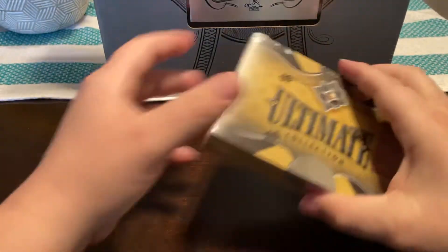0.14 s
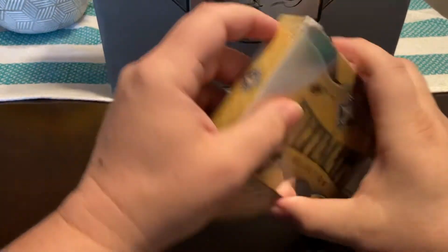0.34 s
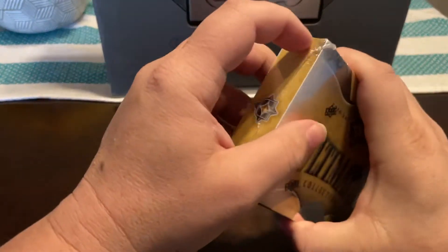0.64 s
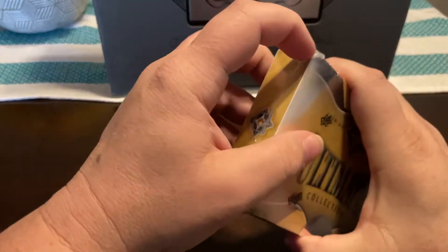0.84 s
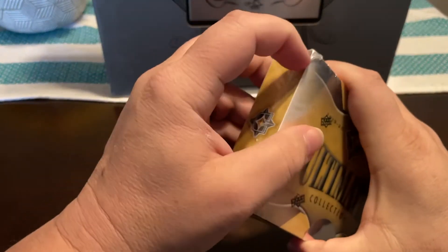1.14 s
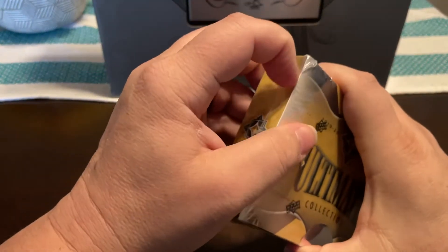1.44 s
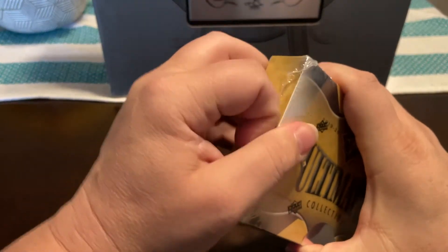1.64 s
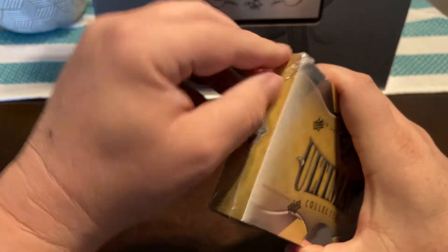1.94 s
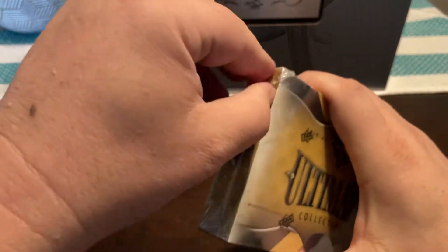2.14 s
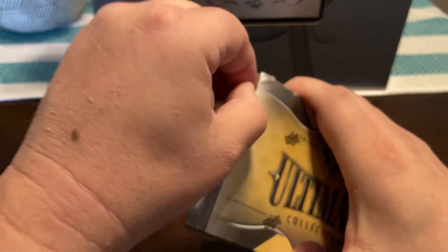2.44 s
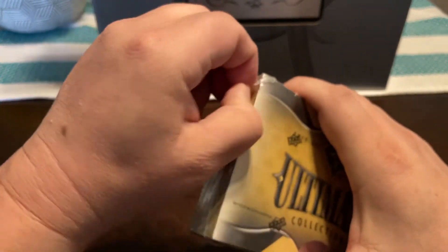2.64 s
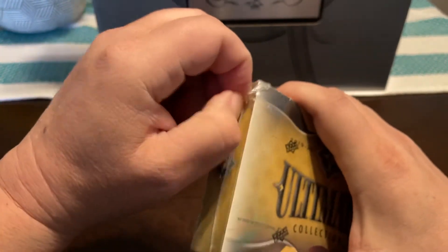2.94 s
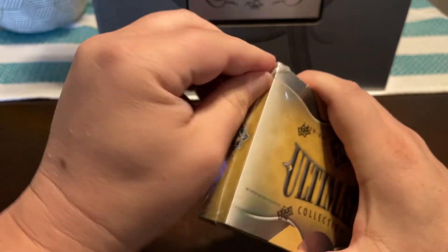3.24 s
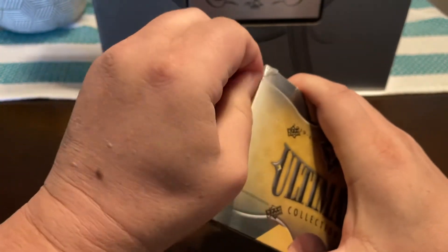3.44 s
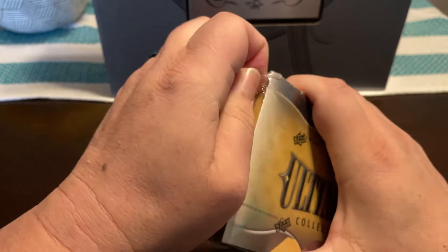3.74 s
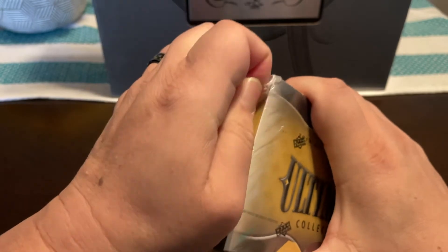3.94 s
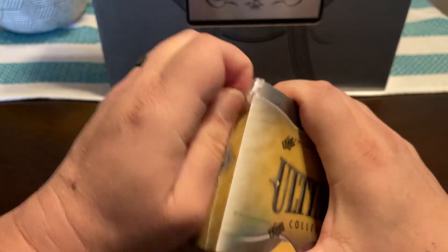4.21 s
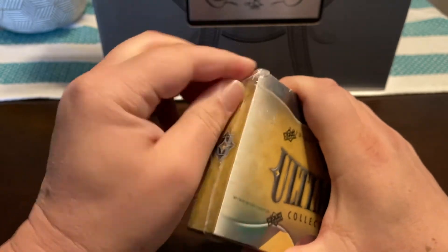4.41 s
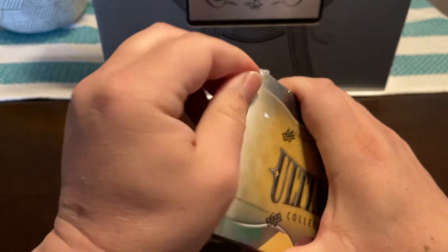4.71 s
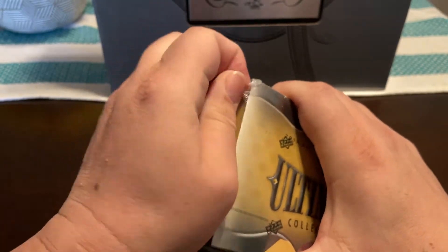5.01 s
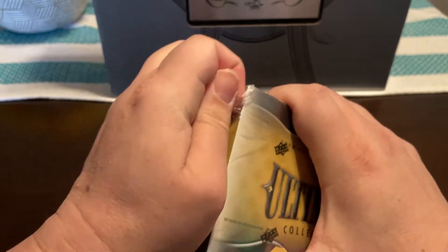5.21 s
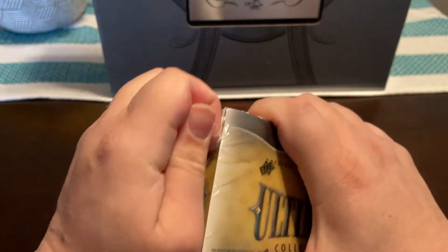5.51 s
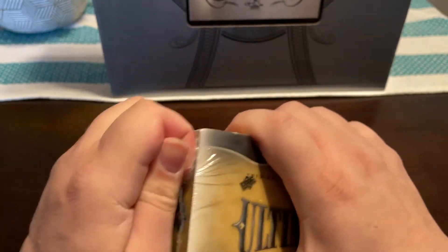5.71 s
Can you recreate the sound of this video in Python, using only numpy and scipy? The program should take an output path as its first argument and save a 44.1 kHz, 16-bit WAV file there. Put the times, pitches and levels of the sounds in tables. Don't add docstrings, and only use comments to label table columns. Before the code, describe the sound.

Close, dry stereo phone pickup in a quiet room with a very faint low hum of distant machines. From 0 to 0.3 s a small cardboard box is taken up: soft hollow thumps, a low table bump and skin rub. It stays nearly quiet until about 0.85 s, when a dull knock and low thud come. Bright film ticks gather from 1.15 s, and at 1.45 s one loud, short snap, woody and cracking, stands far above everything else. Crinkles and rubbing fade after it; knocks and brushing return around 1.8-2.0 s. From 2.1 to 2.8 s there is delicate picking with a thin smooth hiss, then a small knock near 2.9 s and sparse ticks. Crackles thicken after 3.6 s, with a stronger scrunch and box knocks around 4.1-4.35 s. Irregular crisp ticks, pops and light taps continue, with a last crackle and rub near 5.75 s.

```python
import sys
import numpy as np
from scipy import signal
from scipy.fft import rfft, irfft
from scipy.io import wavfile
from scipy.ndimage import uniform_filter1d, minimum_filter1d

SR = 44100
rng = np.random.default_rng(int(sys.argv[2]) if len(sys.argv) > 2 else 0)


def level_to_linear(level):
    exponent = np.asarray(level, float) / 20
    return 10 ** exponent


def transcribe(signal):
    frames = np.atleast_2d(signal).T
    limited = np.clip(frames, -1, 1)
    pcm = np.round(limited * 32767).astype(np.int16)
    wavfile.write(sys.argv[1], SR, pcm)


N = 258426

# start_s [s], peak_db [dB], pitch_hz [Hz], t60_s [s]
THUMPS = [(0.08, -29.5, 411, 0.03), (0.197, -38, 439, 0.048), (0.839, -29.5, 323, 0.089),
          (0.912, -35, 229, 0.054), (1.293, -40, 355, 0.063), (1.329, -31.5, 241, 0.097),
          (1.455, -24, 331, 0.034), (1.574, -46.5, 372.6, 0.06), (1.836, -36.5, 354, 0.12),
          (1.986, -28.5, 326, 0.061), (2.91, -46, 428, .07), (3.221, -47, 225, .07),
          (3.481, -35, 253, 0.056), (3.779, -47.5, 208, .07), (4.214, -30.5, 404, 0.065),
          (4.342, -36, 400, 0.055), (4.522, -33.5, 370, 0.048), (5.244, -38, 270.6, 0.062),
          (5.654, -39, 260, 0.074), (0.104, -35.5, 337, 0.052), (1.868, -36.5, 328, 0.062),
          (4.196, -40, 353, 0.035), (0.249, -54, 430, 0.055), (0.282, -46.5, 402, .05),
          (5.13, -41.5, 344, .05)]


def evened(x):
    return x / np.sqrt(np.mean(x ** 2) + 1e-20)


def peaked(x):
    return x / np.abs(x).max()


def read(points, hz):
    point_hz, value = np.transpose(points)
    return np.interp(np.log(hz + 1), np.log(point_hz + 1), value)


def colour(x, points, turn=1):
    n = x.shape[-1]
    gain = level_to_linear(read(points, np.fft.rfftfreq(n, 1 / SR)))
    return irfft(rfft(x) * turn * gain, n)


def band(x, lo_hz, hi_hz):
    sos = signal.butter(2, [lo_hz, hi_hz], "bandpass", fs=SR, output="sos")
    return signal.sosfilt(sos, x)


def dying(t, t60_s, rise_s):
    return (1 - np.exp(-t / rise_s)) ** 2 * level_to_linear(-60 * t / t60_s)


def add(mix, start_s, sound):
    part = mix[..., round(start_s * SR):][..., :sound.shape[-1]]
    part += sound[..., :part.shape[-1]]


def ticks():
    # start_s [s], peak_db [dB], pitch_hz [Hz], dull_db [dB]
    loud = [(.8377, -31, 10800, -2.5), (1.149, -33, 9600, -16), (1.1652, -26, 10700, -16.5),
            (1.1844, -36, 9900, -19), (1.2037, -31, 11100, -19), (1.2939, -41.5, 12200, -11),
            (1.3156, -25.5, 11000, -8), (1.3366, -23, 9400, -4), (1.4318, -37, 10200, -8),
            (1.4515, -11, 10600, -14), (1.8107, -35, 11400, -32), (1.9025, -44, 10500, 3),
            (1.9625, -25.5, 9900, -20), (1.9776, -31, 10770, -15), (1.9882, -20.5, 10800, -2.5),
            (2.0347, -28, 10400, -36), (2.5872, -33.5, 9900, -25.5), (4.1015, -35, 11090, -14),
            (4.1208, -31.5, 9600, -19), (4.4922, -27, 11900, -23), (4.698, -32, 12500, -12.5),
            (4.7041, -35.5, 10100, -24.5), (4.7905, -33, 9600, -12.5), (4.795, -33.5, 10300, -25),
            (4.9882, -28.5, 9800, -15), (5.3416, -29.5, 11100, -15), (5.4112, -24, 11250, -13),
            (5.4407, -31, 13600, -4.5), (5.7566, -35, 11000, -16), (5.7768, -33.5, 12600, 2)]
    # start_s [s], peak_db [dB]
    seam_buckles = [(.8941, -52), (.9794, -66), (1.051, -55), (1.038, -54), (1.083, -55.5), (1.135, -46),
                    (1.3023, -45.5), (1.323, -36), (1.44, -42), (1.445, -39.5), (1.6332, -52), (1.819, -39.5),
                    (1.83, -37), (1.907, -41.5), (2.2442, -46), (2.2618, -38.5), (2.322, -35.5), (2.3388, -43),
                    (2.5286, -46), (2.5514, -58), (2.636, -43.5), (2.877, -42.5), (2.9764, -48.5), (3.0877, -40.5),
                    (3.1362, -50.5), (3.191, -44.5), (3.2767, -58), (3.303, -55), (3.3327, -56), (3.3893, -44),
                    (3.5626, -53), (3.5846, -42.5), (3.607, -52), (3.6948, -41), (3.7057, -47), (3.732, -38.5),
             (3.748, -43), (3.774, -40), (3.802, -40), (3.8105, -35), (3.84, -50), (3.8901, -42),
             (3.8965, -39.5), (4.0669, -50), (4.0865, -35), (4.5816, -48), (4.5974, -43), (4.6798, -44.5),
             (4.7329, -36), (4.7654, -45), (4.8496, -37), (4.867, -45), (5.052, -49), (5.1748, -36.5),
             (5.2343, -55), (5.519, -48), (5.533, -41), (5.718, -37), (5.765, -34.5)]
    # start_s [s], peak_db [dB]
    flaps = [(1.8806, -37.5), (2.0726, -40.5), (2.182, -34), (2.367, -50), (2.4087, -49), (2.619, -45.5),
             (2.851, -46), (3.047, -39.5), (3.08, -48), (3.1023, -45), (3.2201, -43), (3.6143, -51),
             (3.6708, -44.5), (3.8156, -39.5), (3.9518, -34), (4.1278, -44), (4.14, -36.5), (4.192, -45),
             (4.206, -42), (4.461, -46), (4.5343, -40), (4.5603, -45), (5.079, -39), (5.108, -41.5),
             (5.149, -46), (5.2003, -42), (5.2463, -49), (5.256, -51), (5.4873, -33.5), (5.708, -34.5)]
    # freq_hz [Hz], level_db [dB]
    mic = [(7000, -1.5), (8500, -4.5), (11000, 2), (14000, -6), (16800, -3)]
    seam_hz, seam_dull_db, flap_hz, flap_dull_db = 11500, -18, 6240, -10
    pitch_spread, dull_spread_db = 0.11, 4

    rows = list(loud)
    small = [(*b, seam_hz, seam_dull_db) for b in seam_buckles]
    small += [(*b, flap_hz, flap_dull_db) for b in flaps]
    for start_s, db, hz, dull_db in small:
        u, v = rng.standard_normal(2).clip(-2, 2)
        rows.append((start_s, db, hz * (1 + pitch_spread * u), dull_db + dull_spread_db * v))

    out, t = np.zeros((2, N)), np.arange(900) / SR
    for start_s, db, hz, dull_db in rows:
        a, b = rng.standard_normal((2, 900))
        bright = peaked(band(a * dying(t, 0.01, 0.00045), hz * 0.88, hz * 1.134))
        wide = peaked(band(b * dying(t, 0.0061, 0.00056), 5000, 15500))
        dull = peaked(band(b * dying(t, 0.012, 0.00026), 1800, 6300))
        sound = 0.56 * bright + 0.81 * wide + level_to_linear(dull_db) * dull
        side_db = .4 + 1.5 * a[0]
        add(out, start_s, level_to_linear(db + np.array([[side_db], [-side_db]])) * sound)
    return colour(out, mic)


def snap():
    # start_s [s], box_db [dB], crack_db [dB]
    tear = (1.4525, -3.5, -19)
    # mode_hz [Hz], level_db [dB], t60_s [s]
    modes = [(780, -15, .014), (940, -6, .013), (1360, 1, .012), (1520, -9, .014), (1780, -5, .013),
             (2200, -17, .012), (2520, -17, .012), (3900, -17, .012)]
    start_s, box_db, crack_db = tear
    out, t = np.zeros(N), np.arange(6000) / SR
    swing = t - .0025
    box = np.zeros(len(t))
    for hz, db, t60_s in modes:
        box += level_to_linear(db) * np.sin(2 * np.pi * hz * swing) * dying(t, t60_s, .004)
    crack = band(rng.standard_normal(len(t)), 2400, 9300) * dying(t, 0.04, 0.0017)
    strain = np.linspace(0, 1, 400) ** 2
    creak = band(rng.standard_normal(400), 1150, 1900) * strain
    add(out, start_s, level_to_linear(box_db) * peaked(box))
    add(out, start_s - .0006, level_to_linear(crack_db) * peaked(crack))
    add(out, start_s - 350 / SR, level_to_linear(-17.5) * peaked(creak))
    return out


def rings(rows, spread, rough, rise_cycles):
    out, t = np.zeros(N), np.arange(8000) / SR
    for start_s, db, hz, t60_s in rows:
        u, v = rng.random(2)
        second_hz = hz * (1 + spread * (.5 + u))
        pair = np.sin(2 * np.pi * hz * t) + 0.3 * np.sin(2 * np.pi * (second_hz * t + v))
        grit = evened(band(rng.standard_normal(8000), hz * 0.3, hz * 1.86))
        blow = (pair + rough * grit) * dying(t, t60_s, rise_cycles / hz)
        add(out, start_s, level_to_linear(db) * peaked(blow))
    return out


def knocks_and_pings():
    # start_s [s], peak_db [dB], pitch_hz [Hz], t60_s [s]
    knocks = [(0.08, -40, 1070, 0.017), (0.196, -38, 1284, 0.042), (0.407, -41, 1002, 0.026),
              (0.839, -32, 1307, 0.036), (1.294, -35, 1335, 0.023), (1.315, -36.5, 1460, 0.035),
              (1.33, -34, 1330, 0.015), (1.698, -46, 1280, 0.035), (1.833, -26.5, 1390, 0.014),
              (1.858, -30.5, 993, 0.025), (1.989, -30.5, 1043, 0.031), (2.904, -35, 965, 0.032),
              (2.954, -43, 1230, 0.019), (3.221, -47, 992, 0.015), (3.48, -44, 1006, 0.02),
              (3.695, -42.5, 1260, 0.0066), (3.766, -39.5, 1030, 0.028), (3.88, -39.5, 1100, 0.0051),
              (4.095, -37.5, 997, 0.046), (4.169, -31.5, 964, 0.019), (4.194, -39, 980, 0.061),
              (4.335, -43, 996, 0.034), (4.597, -47, 1020, 0.011), (4.843, -45.5, 1090, 0.011),
              (5.046, -43.5, 1060, 0.029), (5.128, -39.5, 1186, 0.022), (5.248, -39, 1280, 0.02),
              (5.41, -32.5, 1300, 0.0088), (5.443, -39.5, 1030, 0.025), (5.777, -34.5, 990, 0.02)]
    # start_s [s], peak_db [dB], pitch_hz [Hz], t60_s [s]
    pings = [
        (1.5, -44, 2300, 0.022),
        (4.856, -45.5, 2640, 0.048),
        (4.8, -47, 1300, 0.017),
        (5.1, -52, 1050, 0.038),
        (2.82, -52.5, 520, 0.041),
    ]
    return rings(knocks + pings, .3, 0.49, 0.95)


def thumps():
    return rings(THUMPS, 0.28, 0.32, 0.51)


def bumps():
    # start_s [s], peak_db [dB], pitch_hz [Hz]
    pushes = [(0.108, -34, 72.6), (0.199, -45, 109), (0.674, -39.5, 118), (0.84, -41, 99),
              (0.911, -26.5, 113), (1.452, -26.5, 112.4), (1.708, -32.5, 109.4), (1.996, -38, 106),
              (2.921, -46.5, 102.8), (4.2, -38, 122.7), (5.125, -43.5, 121.6), (5.246, -43, 96)]
    t60_s = .115
    return rings([(*b, t60_s) for b in pushes], 0.92, 0.085, 0.076)


def pops():
    # start_s [s], peak_db [dB], pitch_hz [Hz]
    creases = [(0.104, -42, 2000), (.121, -47, 2400), (1.439, -41.5, 1800), (1.586, -49, 950),
               (1.625, -41.5, 750), (1.815, -50, 1360), (1.823, -50, 1400), (1.842, -46, 1500),
               (1.849, -42, 1060), (1.853, -42, 3900), (4.578, -47, 1150), (4.607, -50, 1240),
               (2.915, -46.5, 1490), (2.93, -51, 1970), (2.942, -45, 1180), (1.859, -32, 1740),
               (1.902, -47, 1320), (3.6711, -47, 3340), (3.6717, -50.5, 1400), (3.7319, -48, 1300),
               (3.7986, -46, 2180), (3.8282, -46, 4500), (3.829, -46, 1910), (3.9514, -47, 1270),
               (4.0223, -58, 3200), (4.0502, -59, 1280), (4.0871, -48, 2400), (4.134, -50, 1050),
               (4.147, -50, 1100), (4.1684, -42, 2630), (4.204, -41, 1770), (4.307, -45.5, 1760),
               (4.3204, -43, 1890), (4.327, -44.5, 2270), (4.338, -43, 2660), (4.492, -57, 3420),
               (4.6977, -51, 3570), (4.7227, -54, 1890), (4.7641, -59, 1780), (4.8438, -48, 2200),
               (4.9511, -46, 1150), (4.954, -48, 3200), (4.9957, -39, 3640), (5.016, -46, 1050),
               (5.0802, -49, 1260), (5.1078, -44, 3310), (5.1882, -46, 2170), (5.257, -41.5, 2570),
               (5.262, -34.5, 2000), (5.282, -51, 2970), (5.4844, -55, 1500), (5.5328, -63, 2680),
               (5.595, -49, 2900), (5.6533, -50.5, 2140), (5.687, -49.5, 1900), (5.7075, -43, 4290),
               (5.7508, -50, 1250), (5.8292, -54, 1370),
               (2.0772, -50, 1080), (2.1815, -50, 1350), (2.3292, -50.5, 1260), (2.488, -58, 1470),
             (2.5872, -59, 939), (2.6599, -54, 942), (2.7936, -66, 1300), (2.821, -61, 1245),
             (2.8485, -57, 999), (2.8851, -40, 3530), (2.904, -37, 1030), (2.9538, -44.5, 1230),
             (3.0171, -55, 1240), (3.047, -49.5, 3280), (3.08, -55.5, 3410), (3.1024, -63, 1150),
             (3.1368, -63, 947), (3.1583, -63, 991), (3.1907, -58, 960), (3.2204, -45, 1070),
             (3.3893, -58.5, 3190), (3.4421, -55.5, 1770), (3.4805, -45.5, 987)]
    t60_s = 0.01
    return rings([(*p, t60_s) for p in creases], 0.18, 0.5, 1.5)


def grains(per_s, spread_db, t60_s):
    size = level_to_linear(spread_db * np.minimum(rng.exponential(1, N), 5))
    slips = size * (rng.random(N) < per_s / SR)
    puff = dying(np.arange(2000) / SR, t60_s, 0.000086)
    return signal.oaconvolve(slips, puff)[:N] * rng.standard_normal(N)


def strokes():
    # strongest_s [s], rise_s [s], fall_s [s], film_db [dB], card_db [dB]
    moves = [(0, .05, 0.19, -70, -68.5), (.1, 0.047, 0.47, -61.5, -62), (.45, 0.71, 0.19, -69, -66),
             (.66, 0.082, 0.21, -81, -66), (.86, 0.058, 0.1, -85, -62.5), (1.16, .03, 0.19, -69.5, -69),
             (1.33, 0.044, 0.056, -56, -58), (1.469, .033, 0.072, -49.5, -63),
             (1.55, 0.038, 0.25, -62.5, -55.5), (1.85, 0.086, 0.12, -68, -55.5),
             (2.002, .05, 0.22, -68, -57.5), (2.26, 0.28, 0.23, -67, -59.5), (2.62, 0.073, 0.085, -71, -76),
             (2.928, 0.078, 0.1, -60.5, -60.5), (3.091, 0.074, 0.16, -76.5, -78),
             (3.221, 0.099, 0.094, -70, -66), (3.48, 0.086, 0.12, -63.5, -63),
             (3.81, 0.25, 1, -67.5, -63.5), (4.19, 0.24, 0.11, -63, -56.5),
             (4.337, 0.06, 0.035, -63.5, -57), (4.53, 0.061, 0.079, -61.5, -57),
             (4.86, 0.37, 1, -70.5, -64), (5.27, 0.13, 1, -65.5, -62.5), (5.77, 0.12, 0.1, -56, -54.5)]
    card_follows, hollow_follows = 0.67, 0.78
    film_share = 0.95
    rattle_db, rattle_t60_s = -17, 0.25

    t = np.arange(0, N + 64, 64) / SR
    peak_s, rise_s, fall_s, film_db, card_db = np.transpose(moves)[:, :, None]
    away_db = -20 * np.where(t < peak_s, (peak_s - t) / rise_s, (t - peak_s) / fall_s)
    film = film_db + away_db
    card = card_db + card_follows * away_db
    dull = film_share * film + (1 - film_share) * card - 2.5
    hollow = card_db - 1 + hollow_follows * away_db
    levels = []
    for db in (film, dull, card, hollow):
        levels.append(np.interp(np.arange(N) / SR, t, level_to_linear(db.max(0))))
    rattle = dying(np.arange(SR // 2) / SR, rattle_t60_s, .004)
    for start_s, db, *_ in THUMPS:
        add(levels[-1], start_s, level_to_linear(db + rattle_db) * rattle)
    return levels


def rub():
    # start_s [s], length_s [s], film_db [dB], card_db [dB]
    scrunches = [(0.069, 0.053, -72, -55), (0.17, 0.043, -64, -55.5), (1.3154, 0.038, -58, -53.5),
                 (1.568, 0.073, -58.5, -57.5), (1.82, 0.067, -72, -53), (2.9, 0.058, -67, -57),
                 (1.695, 0.042, -85, -64), (4.07, 0.064, -53, -75), (4.167, 0.051, -49.5, -47),
                 (4.301, 0.046, -63, -61), (0.22, 0.1, -70.5, -68), (0.42, 0.13, -72.5, -77.5),
                 (0.58, 0.09, -70, -91), (3.373, .175, -68.5, -79), (2.6, .04, -97, -70),
                 (2.44, .3, -89, -69.5), (1.0, 0.092, -93, -69.5), (1.46, .07, -56.5, -52),
                 (4.46, 0.05, -85, -65), (5.247, 0.034, -84, -50.5), (5.7, 0.059, -54, -69)]
    # start_s [s], end_s [s], catch [0-1] of the nails
    gliding = [
        (0, .8, 0),
        (2.1, 2.58, 1),
        (3.39, 3.56, 0),
    ]
    # freq_hz [Hz], level_db [dB per Hz]
    film_tone = [(4000, -16.5), (5500, -3), (7300, -4), (8400, -16), (9600, -1.5), (12100, -4),
                 (13600, -11), (14600, -10), (16500, -27.5)]
    # freq_hz [Hz], level_db [dB per Hz]
    card_tone = [(500, -6.5), (650, -6), (1030, 0.5), (1500, -4.5), (2300, -8.5), (3000, -23)]

    film, dull, card, hollow = strokes()
    for start_s, length_s, film_db, card_db in scrunches:
        burst = signal.windows.tukey(round(length_s * SR), .4)
        add(film, start_s, level_to_linear(film_db) * burst)
        add(dull, start_s, level_to_linear(film_db - 13.5) * burst)
        add(card, start_s, level_to_linear(card_db) * burst)

    catching, smooth = np.ones(N), np.zeros(N)
    for start_s, end_s, catch in gliding:
        span = slice(round(start_s * SR), round(end_s * SR))
        catching[span] = catch
        smooth[span] = .7
    even = smooth * rng.standard_normal((2, N))
    rough = np.sqrt(1 - smooth ** 2)

    catches = catching * evened(grains(200, 3, 0.007))
    slips = evened(grains(3000, 2, 0.013)) + 1.5 * catches
    dull_slips = .4 * catches + even[0] + rough * evened(grains(500, 2.0, 0.022))
    card_slips = even[1] + rough * evened(grains(700, 2.4, 0.021))
    hollow_slips = band(band(grains(130, 1.3, 0.018), 240, 480), 240, 480)
    out = film * evened(colour(slips, film_tone))
    out += dull * evened(band(dull_slips, 2500, 4600))
    out += card * evened(colour(card_slips, card_tone))
    return out + hollow * evened(hollow_slips)


def sweeps():
    # start_s [s], length_s [s], level_db [dB], centre_hz [Hz]
    passes = [
        (0.085, 0.46, -81, 3700),
        (2.18, 0.45, -74, 4460),
        (3.389, 0.13, -77, 3450),
        (1.696, 0.048, -56, 1380),
        (1.82, 0.06, -50, 1350),
    ]
    out = np.zeros(N)
    for start_s, length_s, db, hz in passes:
        noise = rng.standard_normal(round(length_s * SR))
        hiss = evened(band(noise, hz * 0.85, hz * 1.1))
        add(out, start_s, level_to_linear(db) * hiss * signal.windows.tukey(len(hiss), .6))
    return out


def ports(near):
    # freq_hz [Hz], level_db [dB]
    phase_gap = [(60, -10.5), (200, -28), (500, -8.5), (1000, -6), (2000, -2.5), (4400, 1.5), (8000, 3.5),
                 (10500, -5.5), (12200, 2)]
    # freq_hz [Hz], level_db [dB]
    lean = [(200, -34.5), (600, -15), (1200, -34), (3500, -16), (8000, -36.5)]
    middle = near.mean(0)
    gap = colour(middle, phase_gap, turn=1j) + colour(middle, lean)
    return near + np.array([gap, -gap])


def room(x):
    # freq_hz [Hz], t60_s [s]
    decay = [(200, 0.078), (1000, 0.19), (4000, 0.22), (12000, 0.12)]
    taps = np.zeros((2, SR // 2))
    places = np.arange(60, SR // 2 - 20, 20)
    at = places + rng.integers(0, 20, (2, len(places)))
    np.put_along_axis(taps, at, rng.choice([-1., 1.], at.shape), 1)
    hz, t, z = signal.stft(taps, SR, nperseg=256)
    fall = level_to_linear(-60 * t / read(decay, hz)[:, None])
    tail = signal.istft(z * fall, SR, nperseg=256)[1]
    return signal.fftconvolve(x[None], tail / np.linalg.norm(tail[0]), axes=1)[:, :N]


def air():
    # freq_hz [Hz], level_db [dB per Hz]
    hiss_tone = [(15, -49.5), (30, -9), (124, -7), (225, -7), (360, -23.5), (2150, -41), (11000, -56),
                 (16500, -72.5)]
    # line_hz [Hz], width_hz [Hz], level_db [dB]
    hum_lines = [
        (60.4, 6, -66),
        (111, 25, -64),
        (117, 8.6, -63.5),
        (212.4, 6, -67),
    ]
    drone_hz, wander_hz, drone_db = 212, 2.5, -60.5

    a, b = rng.standard_normal((2, N))
    apart = colour(b, [(300, -8.5), (700, 8.5), (16000, -1.5)])
    out = level_to_linear(-59.5) * evened(colour(np.array([a + apart, a - apart]), hiss_tone))
    hz, white = np.fft.rfftfreq(N, 1 / SR), rfft(rng.standard_normal(N))
    for line_hz, width_hz, db in hum_lines:
        line = white / (1 + (2 * (hz - line_hz) / width_hz) ** 2)
        out += level_to_linear(db) * evened(irfft(line, N))
    wander = evened(colour(rng.standard_normal(N), [(6, 0), (12, -60)]))
    phase = 2 * np.pi * np.cumsum(drone_hz + wander_hz * wander) / SR
    return out + level_to_linear(drone_db) * np.sqrt(2) * np.sin(phase)


def scene():
    blows = knocks_and_pings() + thumps() + bumps() + pops()
    near = ticks() + blows + snap() + rub() + sweeps()
    echo = np.pad(near, ((0, 0), (1010, 0)))[:, :N]
    near = near + level_to_linear(-28.5) * echo
    return ports(near) + level_to_linear(-10.5) * room(near.mean(0)) + air()


def top_cut(x):
    return signal.sosfilt(signal.butter(12, 17130, fs=SR, output="sos"), x)


def record(dry):
    # low_hz [Hz], high_hz [Hz], level_db [dB]
    weak_bands = [(7800, 8300, -26), (8300, 8900, -24.5), (12700, 13200, -27), (13200, 13800, -26),
                  (13800, 14600, -21), (14600, 16000, -18.5), (16000, 16900, -15)]
    masked_db = -19
    jolt_db, top_jolt_db = 4, 7

    hz, _, z = signal.stft(dry * level_to_linear([[.5], [-.5]]), SR, nperseg=512, noverlap=384)
    now = (abs(z) ** 2).sum(0)
    power = uniform_filter1d(now, size=9, axis=1)
    rest = power[hz > 500].sum(0)
    treble = now[(hz > 8000) & (hz < 13000)].sum(0)
    jump = treble / (uniform_filter1d(treble, size=21) + 1e-20)
    held_jump = -minimum_filter1d(-jump, size=11)

    local = uniform_filter1d(now, size=9, axis=0)
    nearby = -minimum_filter1d(-local, size=9, axis=1)
    z *= (local > nearby * level_to_linear(2 * masked_db)) | (hz < 3000)[:, None]
    for lo_hz, hi_hz, db in weak_bands:
        inside = (hz >= lo_hz) & (hz < hi_hz)
        if hi_hz > 16000:
            jolted = jump > level_to_linear(2 * top_jolt_db)
        else:
            jolted = held_jump > level_to_linear(2 * jolt_db)
        strong = power[inside].sum(0) > rest * level_to_linear(2 * db)
        z[:, inside] *= strong | (jolted & (lo_hz > 12000))
    z[:, hz >= weak_bands[-1][1]] = 0
    mix = signal.istft(z, SR, nperseg=512, noverlap=384)[1][:, :N]
    return top_cut(mix)


dry = scene()
out = record(dry)
transcribe(out)
```